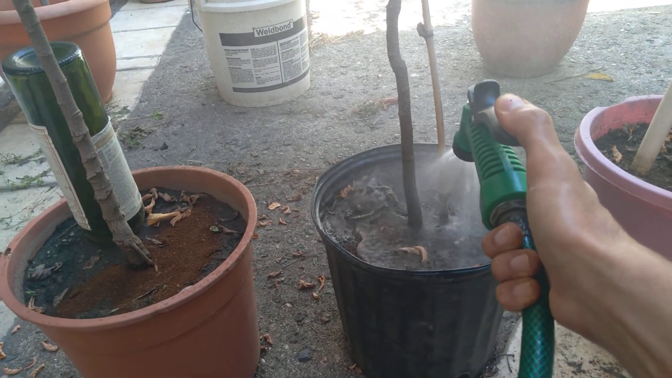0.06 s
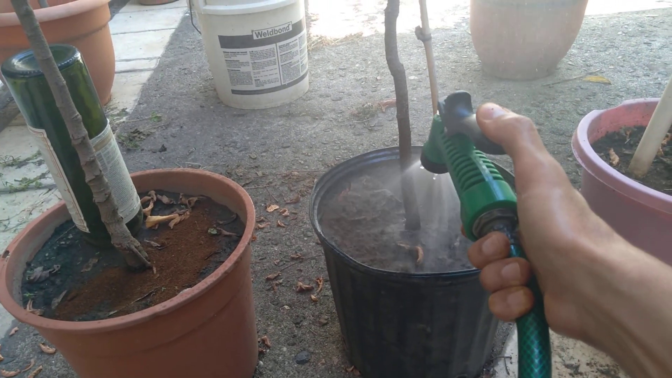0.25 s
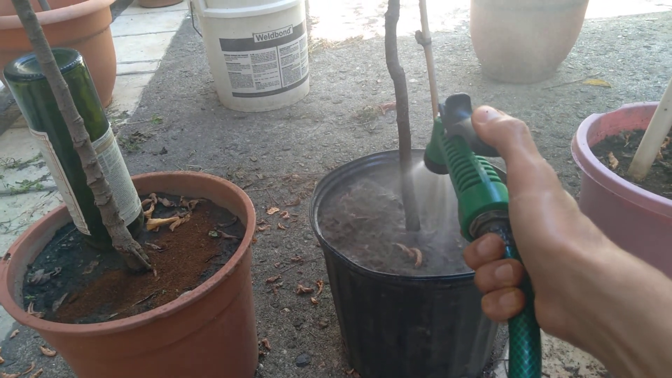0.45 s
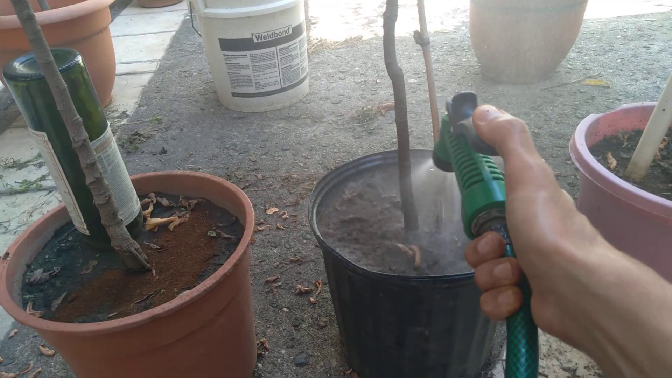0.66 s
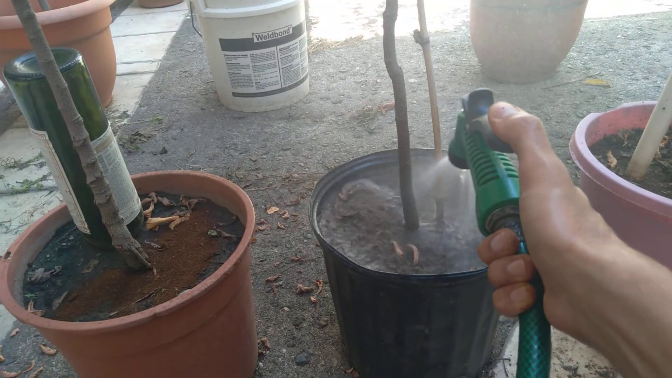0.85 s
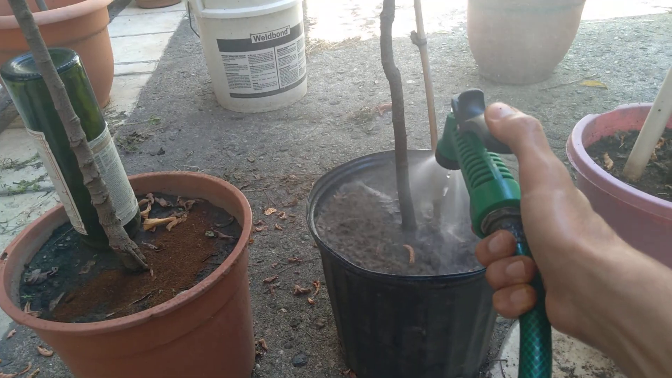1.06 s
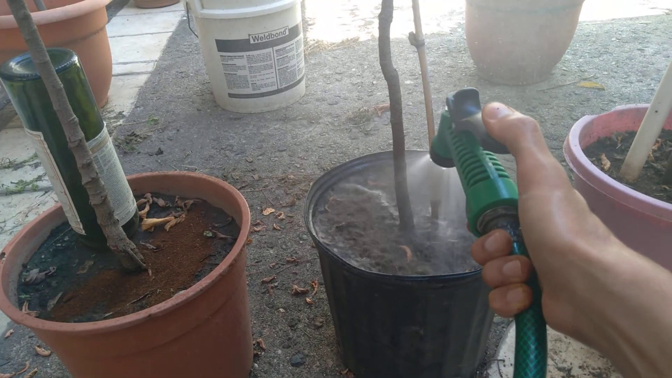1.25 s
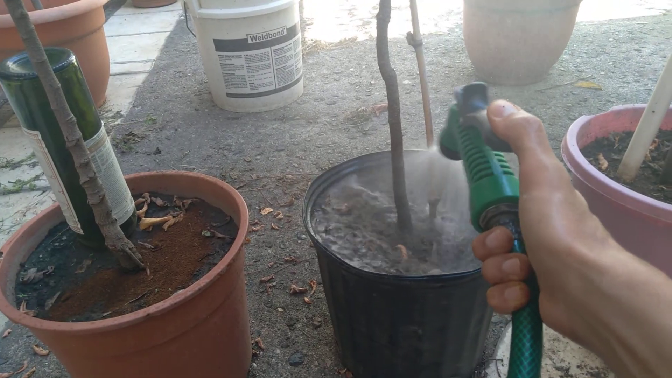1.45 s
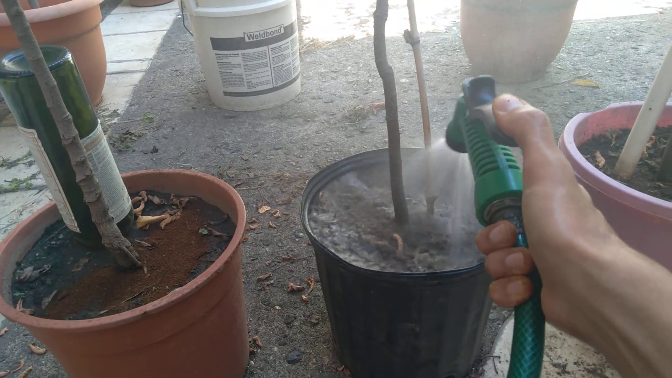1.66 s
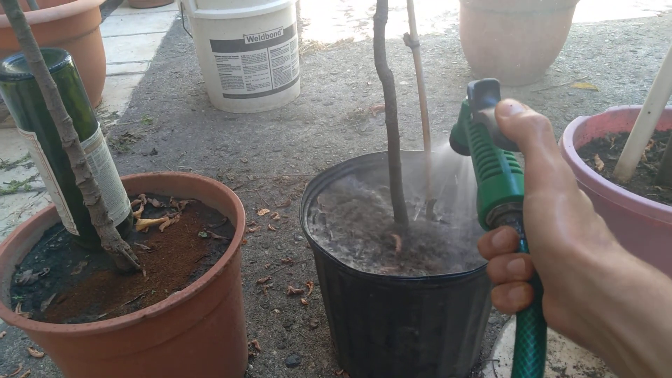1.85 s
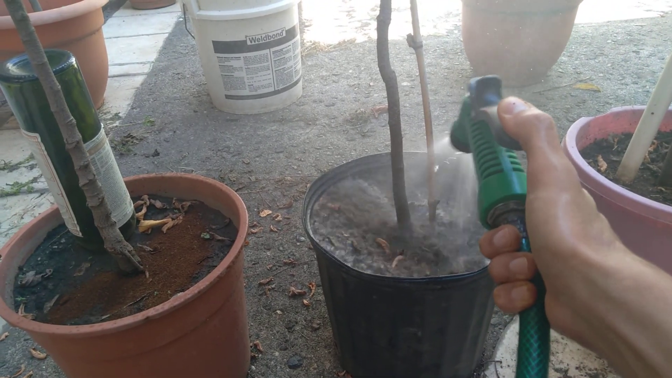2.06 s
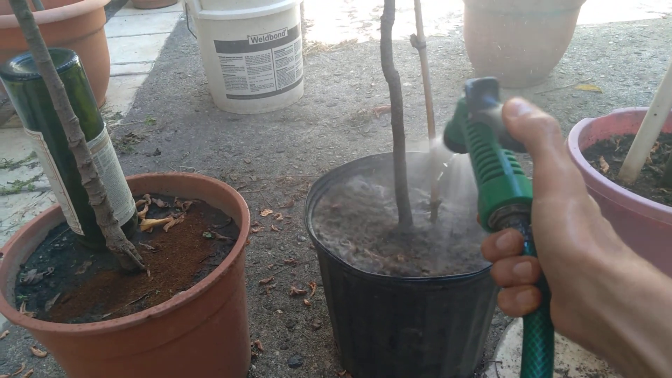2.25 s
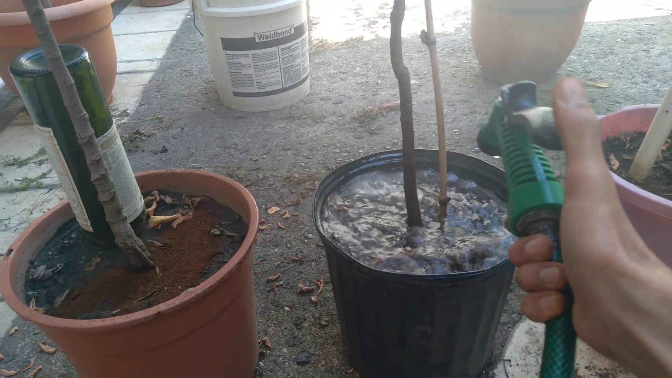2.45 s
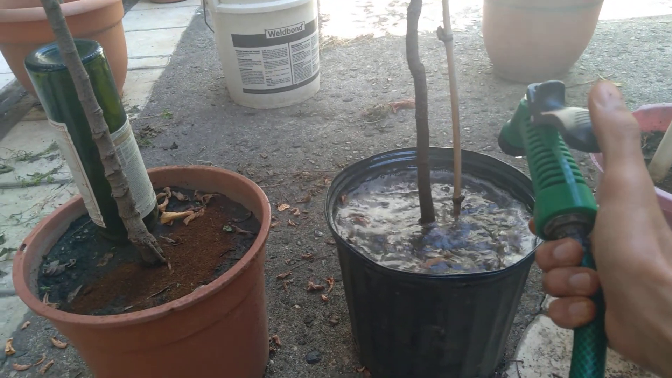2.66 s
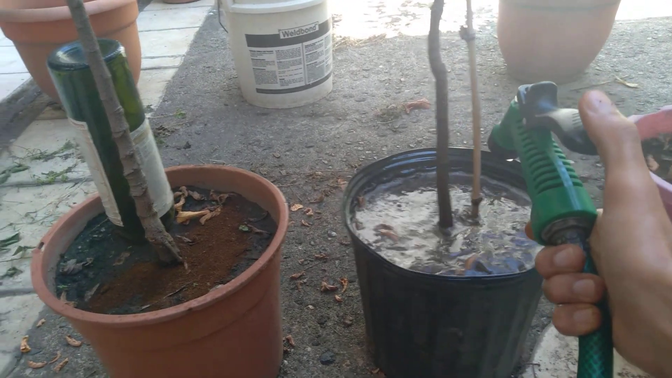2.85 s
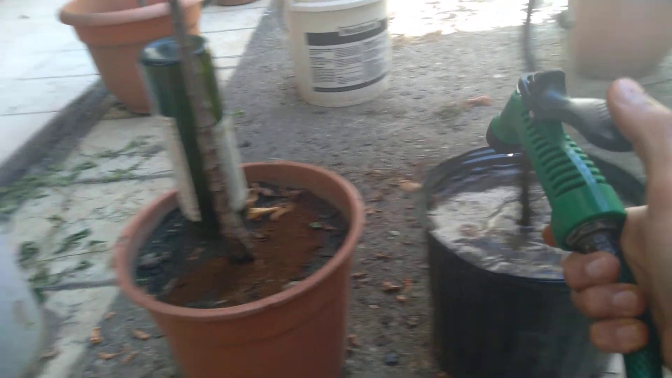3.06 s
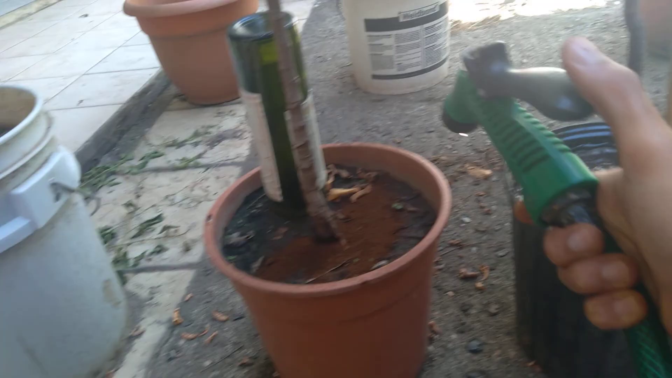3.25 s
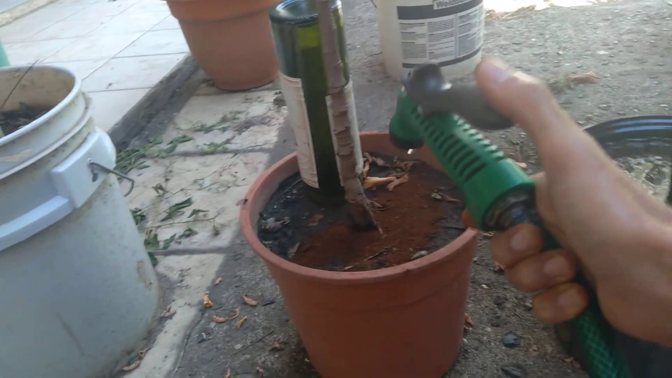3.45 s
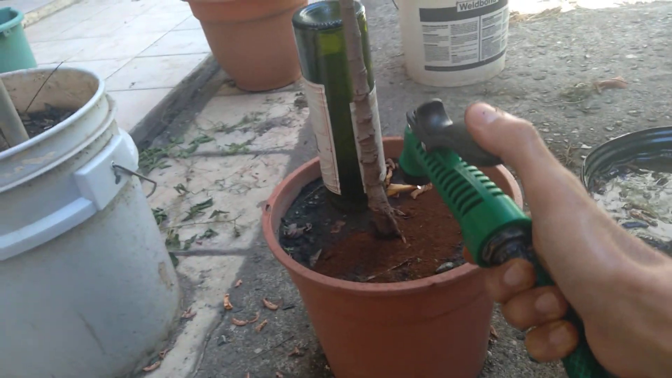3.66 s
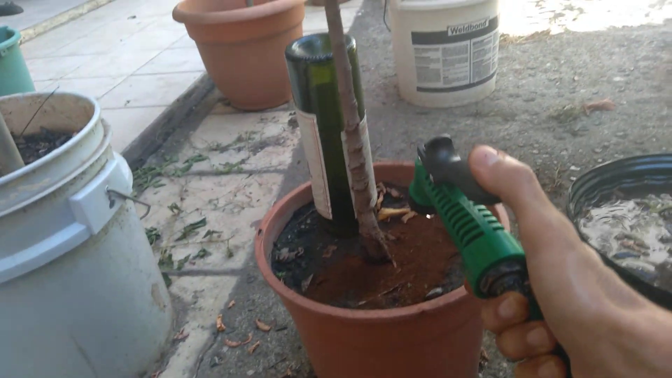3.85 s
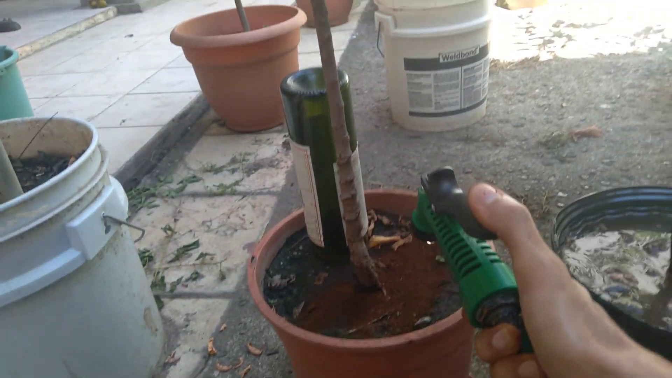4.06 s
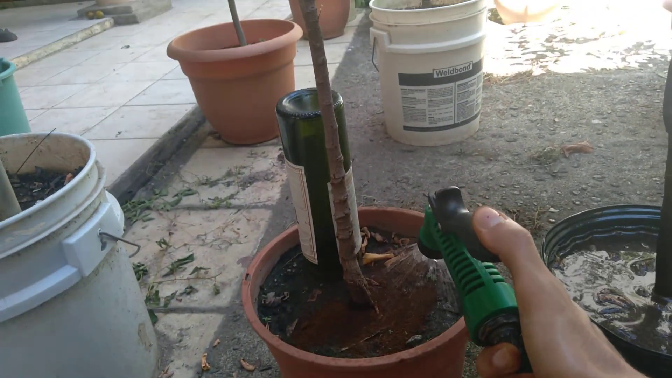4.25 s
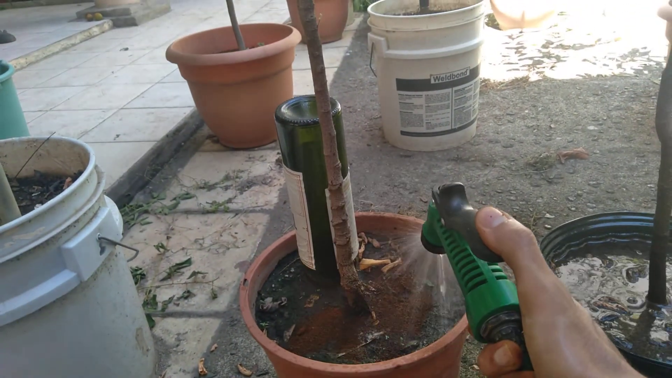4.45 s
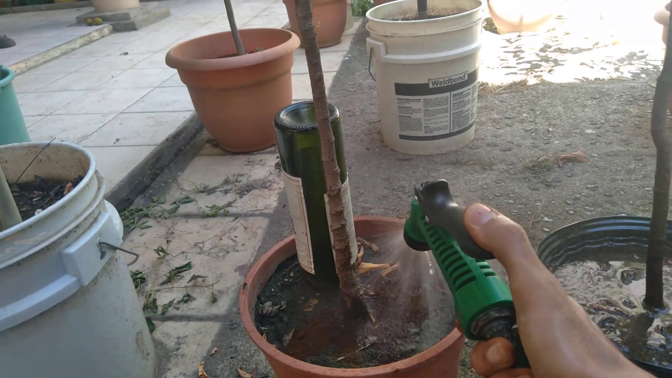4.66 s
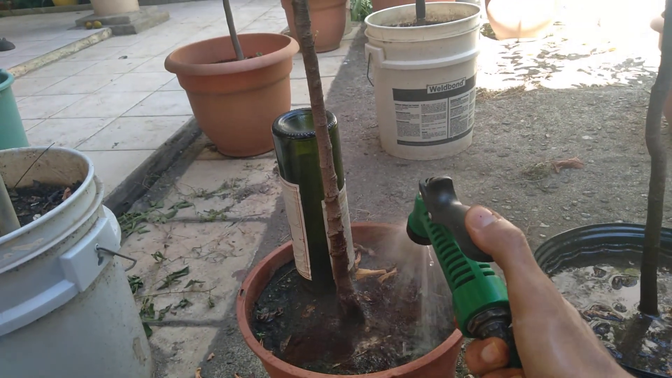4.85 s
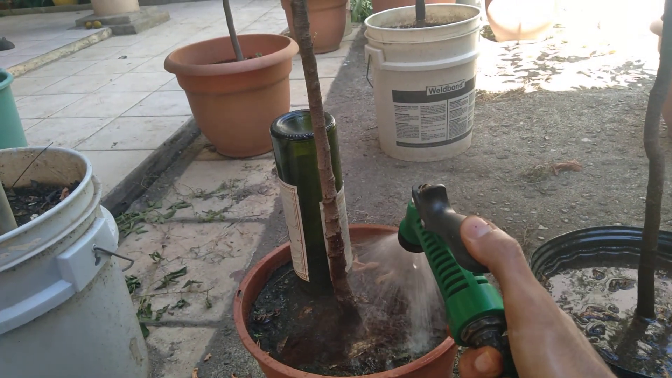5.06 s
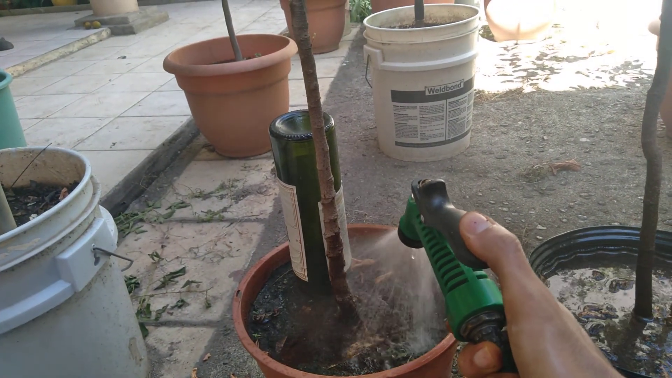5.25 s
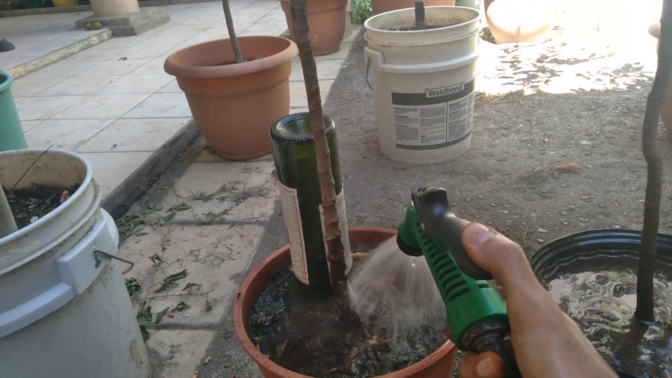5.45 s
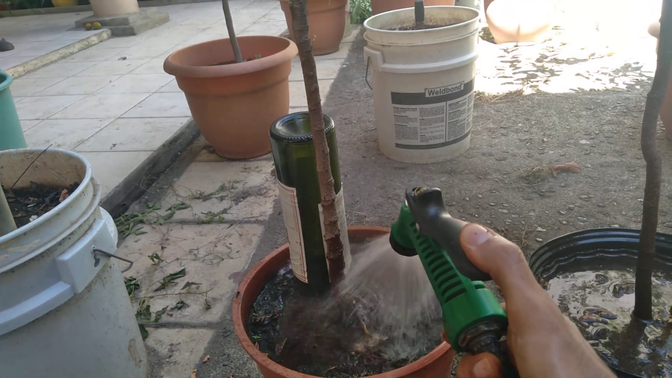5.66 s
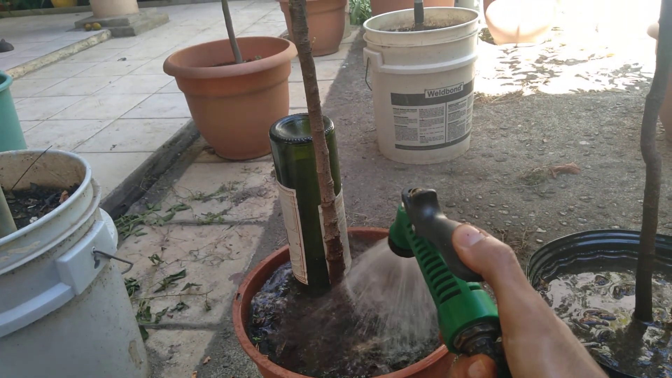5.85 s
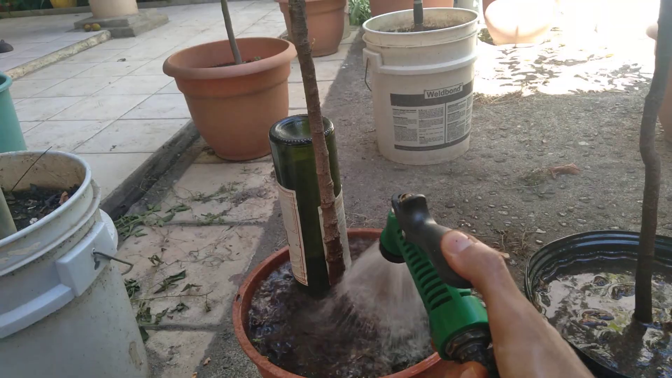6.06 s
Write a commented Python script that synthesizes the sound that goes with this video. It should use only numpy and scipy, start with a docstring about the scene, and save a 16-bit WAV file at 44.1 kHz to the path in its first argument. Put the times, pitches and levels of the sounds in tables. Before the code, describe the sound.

A hose nozzle hisses hard into a flooded plant pot, shuts to a thin leaking whistle, clicks, then sprays again onto soil.

```python
"""A garden, with one microphone close to two plant pots as a hand nozzle sprays them.
The valve shuts, seeps for a while and opens again in two steps: jet, splash and gurgle are shaped noise,
the seep a thinner noise band. Behind lie a mains hum, a low drone and a passing engine built from sines,
far traffic, flickering bands, rumble and narrow fluttering puffs, and small knocks of handling made of
short noise bursts and a ringing grip."""
import sys
import numpy as np
from scipy import signal
from scipy.fft import rfft, irfft, next_fast_len
from scipy.io import wavfile
from scipy.ndimage import uniform_filter1d, map_coordinates

SR = 44100
rng = np.random.default_rng(int(sys.argv[2]) if len(sys.argv) > 2 else 0)


def transcribe(signal):
    """Save signal, clipped to [-1, 1], as a 16-bit WAV file at the path in sys.argv[1]."""
    frames = np.atleast_2d(signal).T
    limited = np.clip(frames, -1, 1)
    pcm = np.round(limited * 32767).astype(np.int16)
    wavfile.write(sys.argv[1], SR, pcm)


N = 269671  # length in samples

# Spray in three stages: a full pot, a cracked valve, a dry pot. Levels are those before the surge.
# Each row: time in seconds, jet hiss level in dB, splash level in dB, gurgle level in dB.
SPRAY_STAGES = [
    [(0.0, -13.5, -30, -56), (0.2, -15.5, -34, -51.5), (0.6, -14.5, -32.5, -53.5), (1.1, -13, -30, -52.5),
     (1.55, -13, -30, -52), (2.28, -14.5, -30.5, -52.5), (2.31, -27.5, -42.5, -57), (2.46, -44.5, -52, -83)],
    [(4.06, -90, -83, -73), (4.078, -38.5, -56, -75), (4.1, -30, -62, -73), (4.11, -20.5, -60, -74),
     (4.222, -21.5, -46, -80), (4.355, -21.5, -40, -82)],
    [(4.365, -24, -40.5, -90), (4.403, -26, -36.5, -81), (4.475, -22.5, -35, -63), (4.657, -21, -34, -68),
     (4.75, -21, -33, -80), (4.803, -21.5, -33, -56), (4.949, -16, -32, -55.5), (5.22, -15, -31.5, -60),
     (5.35, -15.5, -33, -66), (5.543, -16.5, -32, -49), (5.7, -15, -32.5, -46.5), (5.85, -15, -33.5, -59.5),
     (6.115, -14, -33.5, -56)],
]
# Fade before the first row and after the last of each spray stage. Each entry: time in seconds.
STAGE_FADES = [0.19, 0.014, 0.013]
# Colour of the jet hiss in each stage. Each row: frequency in Hz, relative level per Hz in dB.
JET_COLOURS = [
    [(2060, -55.5), (3500, -30.5), (4120, -18), (5470, -15.5), (7720, -3.5), (8270, -0.5), (8700, -3.5),
     (9440, -10), (10800, -13), (12100, -15), (13800, -9), (15700, -11.5)],
    [(2410, -50.5), (4100, -33), (4640, -13), (5130, -23), (5520, -12), (5970, -14), (6500, -1.5),
     (6840, 0), (7310, -4), (7960, 3), (8950, -0.5), (10400, -12), (14300, -5.5), (15700, -12.5)],
    [(2060, -41.5), (3500, -22), (5200, -16.5), (5890, -10), (8120, -1), (8650, -2.5), (10200, -13),
     (14000, -7.5), (15700, -12.5)],
]
# Colour of the splash in each stage's pot. Each row: frequency in Hz, relative level per Hz in dB.
POT_COLOURS = [
    [(220, -42), (380, -13), (403, -16), (621, -12.5), (718, -8.5), (1110, -7.5), (1360, -1), (1810, -3),
     (2150, -8), (3160, -3.5), (3800, -5), (4940, -19), (8360, -120)],
    [(290, -66), (500, -32), (720, -11), (900, -18), (1080, -39), (1190, -12), (1500, -6), (1650, 7),
     (2100, -24), (2290, -38), (2550, -15), (2760, -12.5), (4200, -14), (5460, -37), (9240, -120)],
    [(220, -60), (390, -30.5), (500, -16.5), (768, -9), (1040, -14), (1570, 1), (1860, -8.5), (2110, -8.5),
     (2420, -17), (2710, -8.5), (3040, -14.5), (3800, -15.5), (4940, -56), (8360, -120)],
]
# Colour of water pooling in the pot. Each row: frequency in Hz, relative level per Hz in dB.
GURGLE_COLOUR = [(140, -31), (190, -2.5), (300, 3.5), (380, -3.5), (480, -28.5)]
GURGLE_SWING_DB, GURGLES_PER_S = 2, 14  # how far and how fast the pooling comes and goes

# Far traffic and flickering bands, mostly low and middle, heard while the spray rests.
# Each row: time in seconds, far traffic level in dB, flicker level in dB.
YARD_LEVELS = [(2.3, -46, -64), (2.4, -53, -65), (2.83, -51, -62.5), (3.04, -61.5, -66), (3.24, -51, -68),
               (3.26, -59, -74), (3.85, -58.5, -64.5), (4.07, -61.5, -76), (4.4, -47, -70)]
# Colour of the far traffic. Each row: frequency in Hz, relative level per Hz in dB.
TRAFFIC_COLOUR = [(560, -35.5), (950, -26.5), (1090, -5), (1240, 0.5), (1290, -2.5), (1520, -4), (1570, 1),
                  (1690, -2), (1950, -22.5), (2540, -51), (4290, -120)]
# Colour of the flickering bands. Each row: frequency in Hz, relative level per Hz in dB.
FLICKER_COLOUR = [(200, -9), (400, -1), (800, -1), (1000, -6.5), (1900, -7.5), (2200, -2), (3000, -5.5),
                  (3400, -17), (4500, -31), (5000, -8.5), (5500, -14.5), (6200, -33)]
# The low end, before its wobble. Each row: time in seconds, hum, drone and rumble level in dB.
LOW_LEVELS = [(0.0, -64, -54, -58.5), (0.7, -54.5, -56, -55), (1.3, -55, -64, -52), (1.8, -53, -64, -54.5),
              (2.3, -55, -70, -56), (2.94, -47, -63, -55), (3.1, -64.5, -81.5, -63.5),
              (3.8, -66, -74, -69.5), (4.4, -61, -80, -59.5), (4.8, -67, -80, -64.5),
              (5.5, -61.5, -76, -58.5), (6.11, -66, -78, -63)]
# Colour of the rumble. Each row: frequency in Hz, relative level per Hz in dB.
RUMBLE_COLOUR = [(15, -40), (25, -28.5), (70, 1), (113, 4), (183, 4.5), (216, -7.5), (260, -11), (340, -33),
                 (570, -120)]
# Brief swells added to the rumble. Each row: centre in seconds, peak level in dB.
RUMBLE_SWELLS = [(1.69, -56), (1.97, -52), (2.3, -51), (3.93, -55), (4.09, -48), (5.7, -49.5)]
SWELL_S = 0.037  # from the centre of a swell to 1/e of its peak
# Colour of the microphone's own hiss. Each row: frequency in Hz, relative level per Hz in dB.
HISS_COLOUR = [(200, -1), (3000, -3), (4000, -8.5), (10500, -10.5), (13500, 8.5), (16000, 5)]
HISS_DB = -76.5

HUM_HZ, DRONE_HZ, FIRING_HZ = 120, 57, 25.5  # centre pitches
# The engine going by, before its wobble. Each row: time in seconds, third and sixth order level in dB.
ENGINE_LEVELS = [(2.38, -73, -66), (2.56, -46, -54), (2.75, -49, -52.5), (2.82, -46, -43),
                 (2.906, -48, -43), (2.992, -60, -70), (3.12, -77, -79)]
# The other engine orders. Each row: multiple of the firing rate, level beside the third order in dB.
ENGINE_ORDERS = [(1, -19), (4, -14), (7, -21), (8, -28), (9, -23), (11, -25.5)]

# Water through the shut valve, which seats once more: a steady part, then a broken one.
# Each row: time in seconds, level in dB.
SEEP_STAGES = [
    [(2.306, -51), (2.424, -39.5), (3.078, -42), (3.138, -40), (3.243, -43)],
    [(3.249, -51.5), (3.4, -55), (3.6, -62), (4.06, -87)],
]
# Colour of each part of the seep. Each row: frequency in Hz, relative level per Hz in dB.
SEEP_COLOURS = [
    [(2530, -56), (4300, -34), (4950, -15.5), (5170, -14.5), (5550, -21.5), (6080, -9.5), (8190, 1.5),
     (8740, -0.5), (9540, -6.5), (10800, -11), (12300, -34), (12800, -25), (13100, -21), (13900, -22),
     (15700, -28)],
    [(2650, -45), (4500, -25), (5490, -9), (5800, -19), (6350, -18), (7680, 2), (8400, 1.5), (9540, -5),
     (10100, -12), (10200, -26), (11000, -28), (14300, -60), (22000, -120)],
]

# Faint narrow puffs. Each row: centre in seconds, frequency in Hz, envelope peak in dB, length in seconds.
PUFFS = [(2.77, 374, -59, .06), (2.79, 2230, -59, .1), (2.84, 2400, -59, 0.22), (3.043, 650, -57, .05),
         (3.08, 2160, -64, .1), (3.714, 470, -60.5, .09), (3.778, 2790, -66, .14)]

# Handling knocks, levels before the onset is softened and the colour or ring applied.
# Each row: start in seconds, click level in dB, tap level in dB, thud level in dB.
HANDLING_KNOCKS = [(3.224, -66, -54, -40.5), (3.257, -38, -69, -66), (3.274, -44, -62, -54),
                   (3.4254, -37, -57, -53), (3.87, -66, -55.5, -57), (3.925, -68, -50, -47),
                   (3.966, -68, -56, -54), (4.074, -64, -49, -57)]
# Colour of the click. Each row: frequency in Hz, relative level per Hz in dB.
CLICK_COLOUR = [(2400, -36), (4000, -32), (6000, -12), (7800, 13), (9500, -10), (12000, -20), (15500, -18)]
# Colour of the tap. Each row: frequency in Hz, relative level per Hz in dB.
TAP_COLOUR = [(150, -14), (400, 0), (1500, 4), (2400, -20), (3400, -21), (6000, -40)]
# Ring of the hollow grip, varied at each knock. Each row: frequency in Hz, mean level in dB.
GRIP_RING = [(150, 1), (370, -1)]

TOP_HZ = 15760  # nothing passes above this


def amp(db):
    """Gain of a level in dB."""
    return 10 ** (np.asarray(db) / 20)


def unit(x):
    """x at rms 1."""
    return x / np.sqrt(np.mean(x ** 2) + 1e-20)


def noise():
    """White noise for the whole scene."""
    return rng.standard_normal(N)


def gains(rows, fade=0.033):
    """Gain per sample for each dB column, fading over `fade` seconds outside the rows, then silent."""
    times, *columns = np.transpose(rows)
    t = np.arange(N) / SR
    fade_in = t - times[0] + fade
    fade_out = times[-1] + fade - t
    edge = np.clip(np.minimum(fade_in, fade_out) / fade, 0, 1)
    return [edge ** 2 * amp(np.interp(t, times, db)) for db in columns]


def wobble(rate):
    """A smooth random curve, rate knots a second."""
    knots = rng.standard_normal(int(N * rate / SR) + 4)
    return map_coordinates(knots, [np.arange(N) * rate / SR])


def coloured(x, points):
    """x through a causal minimum-phase filter with the (Hz, dB) shape, at rms 1."""
    m = next_fast_len(N + 8192)
    hz, db = np.transpose(points)
    log_hz = np.log(np.fft.rfftfreq(m, 1 / SR) + 1)
    shape = amp(np.interp(log_hz, np.log(hz + 1), db))
    # folding the cepstrum forward in time makes the filter causal
    cepstrum = irfft(np.log(shape + 1e-4), m)
    cepstrum[1:m // 2] *= 2
    cepstrum[m // 2 + 1:] = 0
    response = np.exp(rfft(cepstrum))
    return unit(irfft(rfft(x, m) * response, m)[:N])


def patchy(x, patchy_db, bins, frames):
    """x with patches of random gain over frequency and time."""
    spectrum = signal.stft(x, nperseg=512)[2]
    field = rng.standard_normal(spectrum.shape)
    field = uniform_filter1d(field, bins, axis=0)
    field = uniform_filter1d(field, frames, axis=1)
    return signal.istft(spectrum * amp(patchy_db * unit(field)), nperseg=512)[1][:N]


def drops(per_second, spread_db, share):
    """Single drop impacts of unequal size, with `share` of the power, over the smooth rush of the rest."""
    chance, sign = rng.random((2, N))
    sizes = amp(spread_db * noise())
    hits = (chance < per_second / SR) * sizes * np.sign(sign - 0.5)
    return np.sqrt(share) * unit(hits) + np.sqrt(1 - share) * noise()


def tone(hz, drift_hz):
    """A sine of rms 1 whose pitch drifts."""
    phase = 2 * np.pi * np.cumsum(hz + drift_hz) / SR
    return np.sqrt(2) * np.sin(phase + rng.uniform(0, 2 * np.pi))


def spray():
    """The jet tears into drops at the nozzle, the drops drum in the pot and pool; the flow surges in all."""
    surge = amp(0.23 * wobble(11) + 0.27 * wobble(60))
    tearing = patchy(drops(3500, spread_db=3, share=0.48), patchy_db=1.42, bins=2, frames=10)
    landing = patchy(drops(1500, spread_db=4, share=0.2), patchy_db=2.0, bins=1, frames=12)
    landing = landing * amp(0.97 * wobble(9))
    pooling = coloured(patchy(noise(), patchy_db=2.0, bins=1, frames=8), GURGLE_COLOUR)
    pooling = unit(pooling * amp(GURGLE_SWING_DB * wobble(GURGLES_PER_S)))
    out = 0
    for rows, fade, jet, pot in zip(SPRAY_STAGES, STAGE_FADES, JET_COLOURS, POT_COLOURS):
        hiss, splash, gurgle = gains(rows, fade)
        out = out + hiss * coloured(tearing, jet)
        out = out + splash * coloured(landing + 0.46 * tearing, pot)
        out = out + gurgle * pooling
    return out * surge


def yard():
    """Far traffic, faint bands that flicker on and off, a swelling rumble and the microphone's hiss."""
    traffic_gain, flicker_gain = gains(YARD_LEVELS, fade=0.11)
    traffic = coloured(patchy(noise(), patchy_db=5.5, bins=1, frames=16), TRAFFIC_COLOUR)
    flicker = coloured(patchy(noise(), patchy_db=10.5, bins=1, frames=16), FLICKER_COLOUR)
    t = np.arange(N) / SR
    swells = sum(amp(db) * np.exp(-((t - s) / SWELL_S) ** 2) for s, db in RUMBLE_SWELLS)
    rumble_gain = gains(LOW_LEVELS)[2] * amp(2.5 * wobble(12)) + swells
    rumble = rumble_gain * coloured(noise(), RUMBLE_COLOUR)
    hiss = amp(HISS_DB) * coloured(noise(), HISS_COLOUR)
    return traffic_gain * traffic + flicker_gain * flicker + rumble + hiss


def machines():
    """Mains hum, a low drone and an engine going by: drifting sines, the engine's at its firing orders."""
    hum_gain, drone_gain, _ = gains(LOW_LEVELS)
    hum = hum_gain * amp(2.1 * wobble(8.4)) * tone(HUM_HZ, 1.65 * wobble(16))
    drone = drone_gain * amp(2.5 * wobble(8.6)) * tone(DRONE_HZ, 1.5 * wobble(6.1))
    third, sixth = gains(ENGINE_LEVELS, fade=0.08)
    drift = 0.26 * wobble(11)  # in Hz, shared so that the orders stay in tune
    engine = third * amp(1.6 * wobble(14)) * tone(3 * FIRING_HZ, 3 * drift)
    engine += sixth * amp(2.4 * wobble(13)) * tone(6 * FIRING_HZ, 6 * drift)
    for order, db in ENGINE_ORDERS:
        engine += third * amp(db + 3 * wobble(15)) * tone(order * FIRING_HZ, order * drift)
    return hum + drone + engine


def seep():
    """A thin leak sings in the nozzle's narrow band and breaks into patches as it dies."""
    steady = patchy(drops(2500, spread_db=2.7, share=0.15), patchy_db=2.0, bins=2, frames=12)
    broken = patchy(noise(), patchy_db=4.5, bins=2, frames=14)
    out = 0
    for rows, leak, colour in zip(SEEP_STAGES, (steady, broken), SEEP_COLOURS):
        out = out + gains(rows, fade=0.0035)[0] * coloured(leak, colour)
    return out


def puffs():
    """Narrow puffs, each a fluttering sine that swells and fades."""
    out = np.zeros(N + SR)
    t = np.arange(-SR // 3, SR // 3) / SR
    for s, hz, db, length in PUFFS:
        flutter_rate = np.clip(50 + 0.07 * hz, 1, 800)  # knots a second: wider band at higher pitch
        flutter = map_coordinates(rng.standard_normal(600), [(t - t[0]) * flutter_rate])
        envelope = amp(db) * np.exp(-(2.9 * t / length) ** 2)
        start = round((s + t[0]) * SR)
        out[start:start + len(t)] += envelope * flutter * np.sin(2 * np.pi * hz * t)
    return out[:N]


def handling():
    """Each knock is a bright plastic click, a dull tap and a short soft thud of the ringing grip."""
    clicks, taps, thuds = np.zeros((3, N + SR))
    t = np.arange(SR // 5) / SR
    for s, click_db, tap_db, thud_db in HANDLING_KNOCKS:
        start = round(s * SR)
        at = slice(start, start + len(t))
        # each part falls 60 dB in the seconds under t; tap and thud have a soft onset
        clicks[at] += amp(click_db - 60 * t / 0.014) * rng.standard_normal(len(t))
        tap_envelope = amp(tap_db - 60 * t / 0.043) * (1 - np.exp(-t / 0.003))
        taps[at] += tap_envelope * rng.standard_normal(len(t))
        ring = sum(amp(db + rng.normal(0, 2.7)) * np.sin(2 * np.pi * hz * t) for hz, db in GRIP_RING)
        thuds[at] += amp(thud_db - 60 * t / 0.053) * (1 - np.exp(-t / 0.0032)) * ring
    clicks, taps, thuds = clicks[:N], taps[:N], thuds[:N]
    # colouring sets rms 1, so the level from before is put back
    bright = np.std(clicks) * coloured(clicks, CLICK_COLOUR)
    dull = np.std(taps) * coloured(taps, TAP_COLOUR)
    return bright + dull + thuds


def scene():
    """One microphone feeds both channels."""
    mono = spray() + yard() + machines() + seep() + puffs() + handling()
    return np.tile(mono, (2, 1))


def record(dry):
    """The microphone channel passes nothing above its band limit, with a smooth edge 80 Hz wide."""
    m = next_fast_len(N + 8192)
    edge = np.clip((TOP_HZ - np.fft.rfftfreq(m, 1 / SR)) / 80, 0, 1)
    return irfft(rfft(dry, m) * np.sin(edge * np.pi / 2) ** 2, m)[:, :N]


dry = scene()
out = record(dry)
transcribe(out)
```